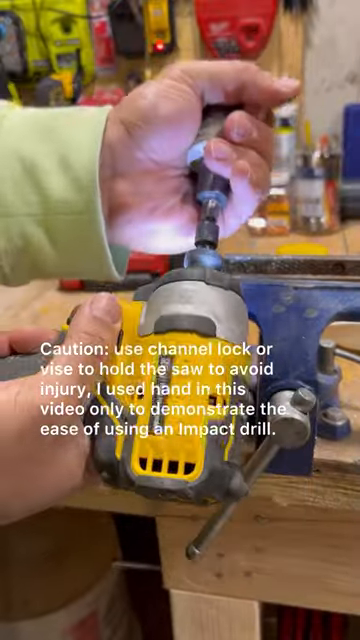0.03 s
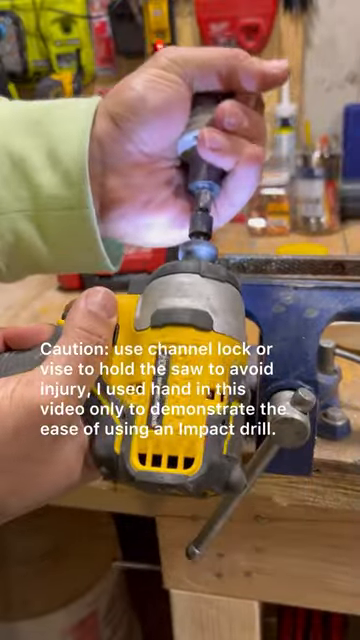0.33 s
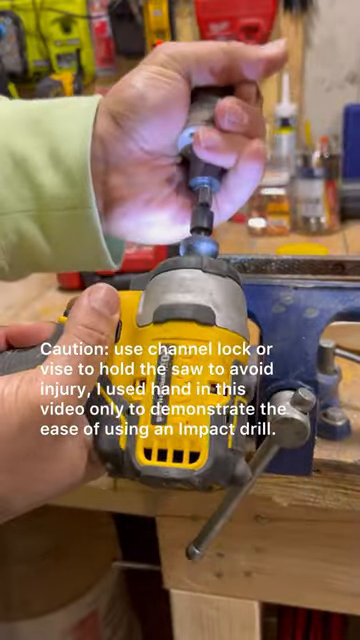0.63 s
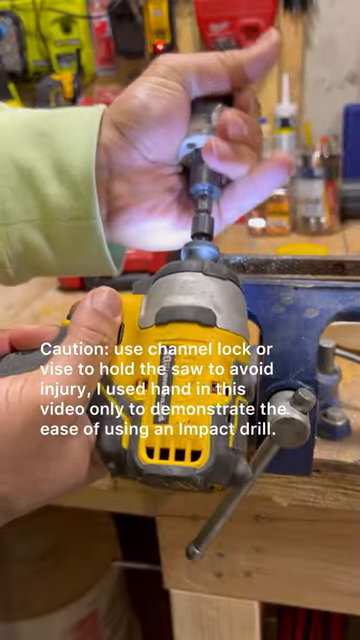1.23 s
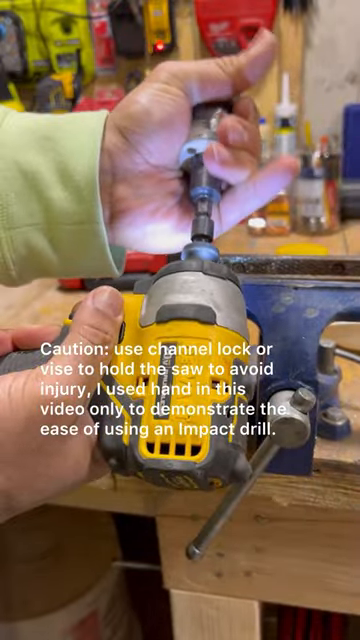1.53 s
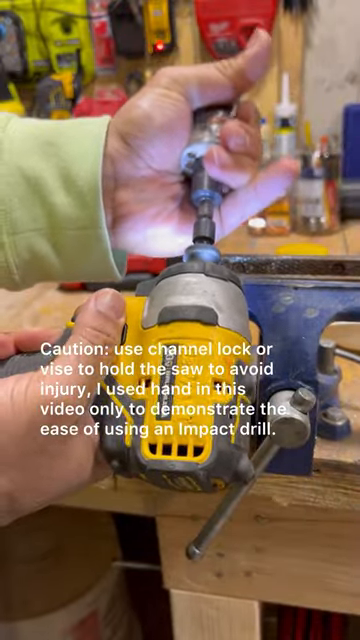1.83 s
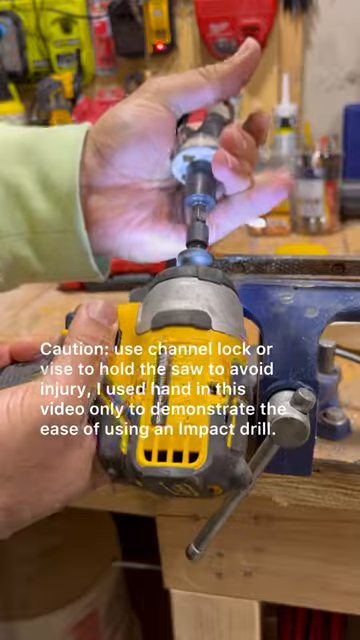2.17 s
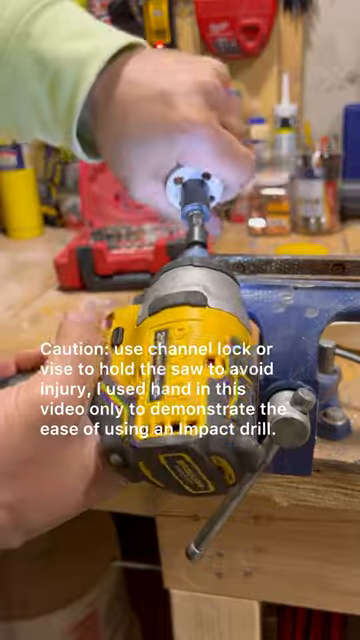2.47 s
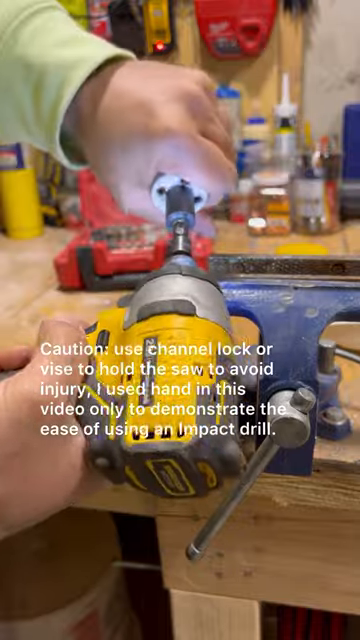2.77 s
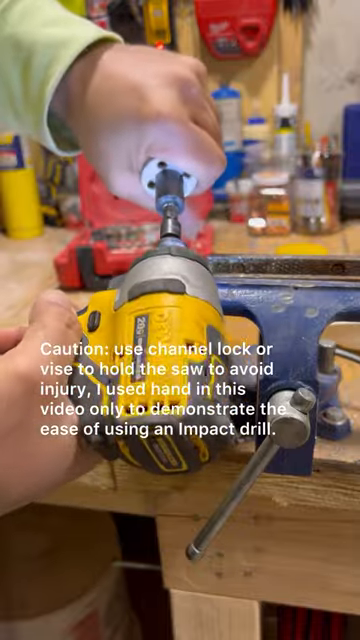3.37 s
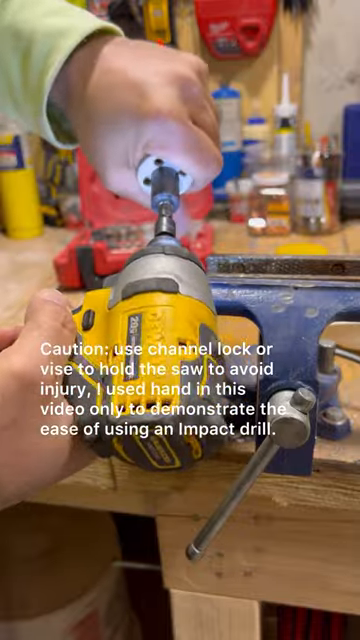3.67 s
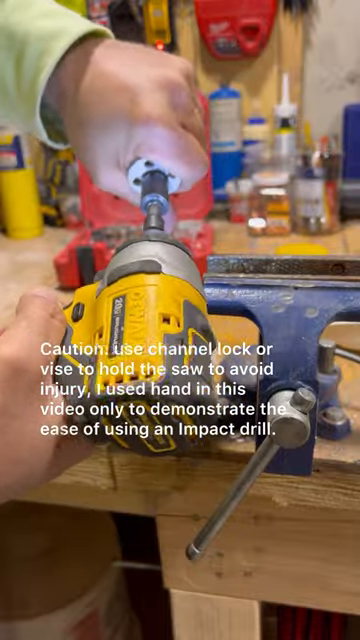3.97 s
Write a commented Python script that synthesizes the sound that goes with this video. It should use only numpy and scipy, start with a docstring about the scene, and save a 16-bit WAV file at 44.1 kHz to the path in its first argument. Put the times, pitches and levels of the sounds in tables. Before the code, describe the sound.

A cordless impact driver hammers in two loud rattling bursts with a short pause between.

```python
"""A cordless impact driver turns a hand-held socket in two bursts, close by in a small workshop.
Each burst opens with slow single blows of hammer on anvil, then hammers about 62-81 times a second:
a graze, a strike and two rebounds each time, with the steel ringing and the socket rattling.
Dull falling thuds shake the bench, the socket clicks as the grip changes in the pause,
and at the end the motor whines on, unloaded."""
import sys
import numpy as np
from scipy import signal
from scipy.fft import rfft, irfft, next_fast_len
from scipy.io import wavfile
from scipy.ndimage import uniform_filter1d, map_coordinates

SR = 44100
rng = np.random.default_rng(int(sys.argv[2]) if len(sys.argv) > 2 else 0)


def wrap_up_sound(samples):
    """Save the sound to the file named by the first command line argument, as 16-bit audio."""
    columns = np.atleast_2d(samples).T
    # keep every value between -1 and 1, then stretch to whole-number steps
    tamed = np.clip(columns, -1, 1)
    steps = np.round(tamed * 32767).astype(np.int16)
    wavfile.write(sys.argv[1], SR, steps)


N = 176400
REBOUND_S, TOP_HZ = .0029, 15900  # from strike to first rebound; band limit


def amp(db):
    """Decibels to gain."""
    return 10 ** (np.asarray(db) / 20)


def unit(x):
    """Scale to rms 1."""
    return x / np.sqrt(np.mean(x ** 2) + 1e-20)


def along(points, hz):
    """Read a (frequency [Hz], value) curve on a log axis."""
    f, v = np.transpose(points)
    return np.interp(np.log(hz + 1), np.log(np.abs(f) + 1), v)


def grid():
    """Frequencies of the padded transform."""
    return np.fft.rfftfreq(2 * next_fast_len(N * 2 // 3), 1 / SR)


def filtered(x, response):
    """Filter x with a response on the frequency grid."""
    return irfft(rfft(x, 2 * len(response) - 2) * response)[..., :N]


def colour(*spectra):
    """A causal EQ of unit power from stacked (frequency [Hz], level [dB]) curves."""
    hz = grid()
    gain = amp(sum(along(s, hz) for s in spectra))
    gain /= np.sqrt(np.mean(gain ** 2 * (hz < TOP_HZ)))
    cepstrum = irfft(np.log(np.maximum(gain, 1e-6)))
    cepstrum[1:len(hz) - 1] *= 2  # fold to minimum phase
    cepstrum[len(hz):] = 0
    return np.exp(rfft(cepstrum))


def resonances(rows):
    """An EQ curve from peaks (centre [Hz], width [Hz], gain [dB])."""
    hz = np.geomspace(100, SR / 2, num=2000)
    curve_db = sum(db / (1 + (2 * (hz - centre) / width) ** 2) for centre, width, db in rows)
    return np.transpose([hz, curve_db])


def wobble(rate):
    """A smooth random curve, rate knots a second."""
    knots = rng.standard_normal(int(N * rate / SR) + 4)
    return map_coordinates(knots, [np.arange(N) * rate / SR])


def burst(t60):
    """Frequency response of a short dying noise burst, roughly flat."""
    t = np.arange(2 * len(grid()) - 2) / SR
    z = rfft(rng.standard_normal(len(t)) * np.exp(-np.log(1000) * t / t60))
    flat = irfft(z / (np.abs(z) + .2 * np.abs(z).mean()))
    flat *= np.exp(-(np.minimum(t, 5 * (t[-1] - t)) / t60) ** 2)  # keep it tight
    return rfft(flat / np.linalg.norm(flat))


def contacts(s, db, t60, *spectra, firm=1):
    """Steel hits at times s: part rings alike each time, part is fresh clatter, more so when less firm."""
    # share of a firm hit that repeats (frequency [Hz], power share [0-1])
    repeatable = [(300, .6), (750, 0.87), (3000, 0.84), (6000, 0.5), (14000, .3)]
    scatter_db = .8 * rng.standard_normal(len(s))
    size = amp(db + scatter_db) * np.sqrt(.003 * SR)  # level over 3 ms
    taps = np.bincount(np.clip(np.round(s * SR).astype(int), 0, N), size, N + 1)[:N]
    decay = np.exp(-2 * np.log(1000) / (t60 * SR))
    clatter = np.sqrt(signal.lfilter([1 - decay], [1, -decay], taps ** 2)) * rng.standard_normal(N)
    share = np.clip(firm * along(repeatable, grid()), 0, 1)
    body = colour(*spectra)
    alike = filtered(taps, body * burst(t60) * np.sqrt(share))
    return alike + filtered(clatter, body * np.sqrt(1 - share))


def ringing(s, db, modes):
    """Every hit rings the same few steel modes."""
    t = np.arange(SR // 2) / SR
    ring = sum(amp(level - 60 * t / t60) * np.cos(2 * np.pi * hz * t) for hz, level, t60 in modes)
    taps = np.bincount(np.round(s * SR).astype(int), amp(db), N)
    return signal.fftconvolve(taps, ring)[:N]


def room_tone():
    """A faint bed of workshop air and hum."""
    # air noise and hum tones, each (frequency [Hz], level [dB])
    air_eq = [(25, -42.5), (60, -11.5), (82, -8), (125, -13.5), (300, -11.5), (800, -18.5), (2100, -23.5),
              (3000, -29), (5000, -34.5), (9000, -37), (15800, -39.5)]
    hum_tones = [(80.7, -83.5), (1184, -94.5), (2095, -88), (2614, -92), (3973, -95.5)]
    hum = sum(amp(db) * np.sqrt(2) * np.sin(2 * np.pi * hz * np.arange(N) / SR) for hz, db in hum_tones)
    return amp(-71.5) * unit(filtered(rng.standard_normal(N), colour(air_eq))) + hum


def motor():
    """Pulsing gear and fan noise swells in with the trigger; once unloaded, the motor whines."""
    # trigger pulls (on [s], off [s], level [dB])
    pulls = [(-.1, 2.1, -35), (2.607, 2.665, -47.5), (2.66, 4.1, -39.5)]
    # gear and fan noise (frequency [Hz], level [dB])
    gear_eq = [(60, -41), (300, -22), (1500, -14.5), (2700, -10), (3150, -9), (4500, -8.5), (6200, -10),
               (7500, -10.5), (9000, -8), (11000, -17), (15800, -17.5)]
    # free-running whine (time [s], pitch [Hz], level [dB])
    whine_path = [(3.86, 2726, -56), (3.88, 2950, -49), (3.9, 3130, -41), (3.93, 3064, -42),
                  (3.95, 3110, -45.5), (4, 3260, -46)]
    # its first three harmonics (gain [dB])
    harmonics = [-3.5, 0.5, 3]
    spin_up_s, spin_down_t60, gear_hz = .031, .033, 69.3
    t = np.arange(N) / SR
    throttle = sum(amp(db - 60 * np.maximum(t - off, 0) / spin_down_t60)
                   * (1 - np.exp(-np.maximum(t - on, 0) / spin_up_s)) for on, off, db in pulls)
    pulsing = amp(3 * np.sin(2 * np.pi * gear_hz * t) + 2 * wobble(700))
    gears = amp(-1.5) * throttle * filtered(rng.standard_normal(N), colour(gear_eq))
    s, hz, db = np.transpose(whine_path)
    pitch = np.interp(t, s, hz) * (1 + .02 * wobble(1200))
    phase = 2 * np.pi * np.cumsum(pitch) / SR
    whine = sum(amp(gain_db) * np.sin(k * phase) for k, gain_db in enumerate(harmonics, 1))
    swell = amp(np.interp(t, s, db)) * (t > s[0])
    return pulsing * (gears + swell * whine)


def bench_thuds():
    """Jolts cross the bench as bending waves: the highs arrive first, so each thud sweeps down."""
    # jolts (time [s], level [dB])
    thuds = [(0.0023, -30), (0.06, -31.5), (0.0841, -36.5), (0.0989, -34), (0.1381, -36), (0.2257, -24),
             (0.2426, -22.5), (0.285, -23), (0.3123, -25.5), (0.3253, -24.5), (0.342, -27.5), (0.3533, -22),
             (0.3803, -30.5), (0.4078, -18), (0.4342, -27), (0.449, -21), (0.463, -21.5), (0.4755, -27),
             (0.49, -30.5), (0.5025, -29.5), (0.5172, -23), (0.5444, -28.5), (0.7087, -35.5), (0.741, -31),
             (0.926, -31.5), (1.024, -44), (1.1187, -37), (1.2264, -37.5), (1.338, -50), (3.0337, -32.5),
             (3.0727, -37), (3.1092, -35), (3.1212, -31.5), (3.1474, -35), (3.1718, -21), (3.1829, -42.5),
             (3.2223, -30)]
    # dull body of the bench (frequency [Hz], level [dB])
    bench_eq = [(25, -18.5), (60, -12), (110, 1.5), (220, 0.5), (400, -4.5), (900, -8.5), (1500, -11),
                (3000, -56)]
    delay_s = .15  # travel time at 1 Hz
    hz = grid()
    wave = amp(along(bench_eq, hz)) * np.exp(-4j * np.pi * delay_s * np.sqrt(hz))
    s, db = np.transpose(thuds)
    jolts = np.bincount(np.round(s * SR).astype(int), amp(db + .5), N)
    return filtered(jolts, wave / np.abs(irfft(wave)).max())


def slow_blows():
    """The hammer ticks up its cam, snaps onto the anvil, rebounds and leaves the socket rattling."""
    # single blows (time [s], level [dB])
    blows = [(.0042, -17.5), (0.0617, -15.5), (0.0994, -15), (.138, -18), (.1757, -15.5), (0.209, -16.5),
             (2.678, -19.5), (2.7104, -18), (2.741, -19.5), (2.7731, -18), (2.8042, -18.5), (2.8353, -17),
             (2.8684, -18)]
    # cam ticks (lead before the blow [s], level against the blow [dB])
    ticks = [(.0145, -13.5), (0.0112, -16.5), (.007, -21), (.0037, -9.5)]
    # tone of the tool at low speed (frequency [Hz], level [dB])
    body = [(35, -44.5), (60, -25), (197, -6.5), (280, -19), (425, -6), (537, -5.5), (1240, -5),
            (2450, -0.5), (2950, -2.5), (4700, 4.5), (5800, -1), (14700, -7.5), (15800, -11.5)]
    s, db = np.transpose(blows)
    lead, tick_db = np.transpose(ticks)
    climb = contacts((s[:, None] - lead).ravel(), (db[:, None] + tick_db).ravel(), .012,
                     body, [(1500, 5), (9000, -4)])
    snap = contacts(s, db - .5, .0071, body, [(1500, -4.5), (5000, 0), (10000, 3.5)])
    rebound = contacts(s + REBOUND_S, db - 6, .0065, body)
    rattle = contacts(s + REBOUND_S, db - 9.5, .034, body)
    return climb + snap + rebound + rattle


def hammering(runs, grip_eq, grip_peaks):
    """Two hammer jaws in turn graze the anvil, strike it and rebound twice; the socket rattles between."""
    # tone of each kind of contact (frequency [Hz], gain [dB])
    graze_eq = [(700, -5), (3000, 3.5), (11000, -4.5)]
    strike_eq = [(300, 3), (1200, 3.5), (2500, 6), (4500, 1), (11000, -5)]
    rebound_eq = [(700, -2), (2500, -1.5), (4500, 1.5), (11000, -0.5)]
    rattle_eq = [(300, -3), (800, -4.5), (2500, -1.5), (11000, -0.5)]
    # ring of socket and anvil (frequency [Hz], level against the strike [dB], t60 [s])
    steel_modes = [(2475, -21, 0.024), (2702, -25, 0.065), (3380, -20, 0.028), (3420, -33.5, 0.11),
                   (4500, -29, .08), (4800, -38, .11)]
    graze_lead_s, last_rebound_s, strike_t60, rebound_t60 = .0017, .0051, .0055, .0086
    jaw_lag_s, jitter_s, bounce_jitter_s = 5e-6, 1e-5, 5e-5
    blows = [(at, *levels) for start, end, rate, *levels in runs for at in np.arange(start, end, 1 / rate)]
    s, strike_db, rebound_db, rattle_db = np.transpose(blows)
    s = s + jaw_lag_s * (-1) ** np.arange(len(s)) + jitter_s * rng.standard_normal(len(s))
    build_db = -3.5 * np.exp(-np.abs(s - s[0]) / .015)  # the first blows are softer
    strike_db, rebound_db = strike_db + build_db, rebound_db + build_db
    slop = bounce_jitter_s * rng.standard_normal((3, len(s)))
    body = grip_eq, resonances(grip_peaks)
    graze = contacts(s - graze_lead_s + slop[2], strike_db - 11, strike_t60, *body, graze_eq)
    strike = contacts(s, strike_db - .5, strike_t60, *body, strike_eq)
    rebounds = contacts(s + REBOUND_S + slop[0], rebound_db - 1.5, rebound_t60, *body, rebound_eq)
    rebounds += contacts(s + last_rebound_s + slop[1], rebound_db - 6.5, rebound_t60, *body, rebound_eq)
    rattle = contacts(s + last_rebound_s, rattle_db + 2, .061, *body, rattle_eq, firm=.3)
    return graze + strike + rebounds + rattle + ringing(s, strike_db, steel_modes)


def socket_shift(x):
    """The socket shifts in the hand: treble resonances come and go; under hard load the ring moves up."""
    # depth of the wandering tone (frequency [Hz], share [0-1])
    depth = [(2000, 0.05), (4500, .6), (9000, 0.99)]
    # spells of hard load (start [s], end [s])
    load_spells = [(.22, .72), (2.89, 3.22)]
    # tone under that load (centre [Hz], width [Hz], gain [dB])
    load_peaks = [(2426, 370, -1.5), (3330, 310, 2.5), (4850, 1100, -1), (6340, 730, 5), (7300, 600, -0.5),
                  (12930, 3000, -0.5)]
    hz, t, z = signal.stft(x, SR, nperseg=256, noverlap=192)

    def ripple(frames):
        """A random pattern, smooth in frequency and time."""
        blur = np.outer(np.hanning(9), np.hanning(frames))
        return unit(signal.fftconvolve(rng.standard_normal(z.shape), blur, 'same'))

    wander_db = (1.5 * ripple(frames=14) + 1.4 * ripple(frames=140)) * along(depth, hz)[:, None]
    load = uniform_filter1d(sum(1. * (t > on) * (t < off) for on, off in load_spells), size=20)
    load_db = np.outer(along(resonances(load_peaks), hz), load)
    return signal.istft(z * amp(wander_db + load_db), SR, nperseg=256, noverlap=192)[1][:N]


def grip_clicks():
    """The loose socket clicks and pings faintly as the hand changes grip."""
    # clicks (time [s], level [dB])
    clicks = [(2.218, -57.5), (2.2215, -66), (2.2394, -69), (2.2797, -57), (2.305, -69), (2.484, -67.5),
              (2.498, -70.5), (2.5496, -73)]
    # their tone (frequency [Hz], level [dB])
    click_eq = [(300, -16), (2000, 2), (4700, 4), (8000, -6), (15000, -3)]
    # ping of the socket (frequency [Hz], level against the click [dB], t60 [s])
    ping_modes = [(1480, -22, .35), (2110, -23, .3), (4715, -21, 0.28), (9900, -25, .15), (14700, -24, .08)]
    s, db = np.transpose(clicks)
    return contacts(s, db, .015, click_eq) + ringing(s, db, ping_modes)


def workshop(x):
    """The short reverb of a cluttered room, with 5 ms of pre-delay."""
    # room decay (frequency [Hz], t60 [s])
    decay = [(100, 0.35), (1000, 0.1), (4000, 0.15), (15000, 0.12)]
    hz, t, z = signal.stft(rng.standard_normal(SR // 2), SR, nperseg=256)
    tail = signal.istft(z * amp(-60 * t / along(decay, hz)[:, None]), SR, nperseg=256)[1]
    return signal.fftconvolve(np.pad(x, (SR // 200, 0)), tail / np.linalg.norm(tail))[:N]


def scene():
    """One burst in an open hand, one in a fist; the tool sits centre, widest in the top treble."""
    # steady hammering (start [s], end [s], rate [blows/s], strike [dB], rebound [dB], rattle [dB])
    runs = [(0.224, 0.267, 64.7, -20.5, -15, -21), (0.2715, 0.553, 73, -17.5, -17, -26),
            (0.5595, 0.718, 73.7, -20, -19, -29), (0.726, 0.895, 64.8, -22, -20.5, -29),
            (0.9004, 1.305, 73.6, -22.5, -21.5, -30), (1.3107, 1.703, 72.3, -23, -21.5, -29.5),
            (1.709, 2.102, 72.58, -25, -20.5, -31), (2.893, 2.936, 62, -19.5, -14.5, -23.5),
            (2.9408, 3.005, 71.34, -17.5, -15.5, -23.5), (3.0095, 3.217, 78, -18, -17, -22.5),
            (3.2241, 3.636, 72.2, -18, -20, -25), (3.6413, 3.859, 81.3, -20.5, -19.5, -27.5)]
    # tone of tool and socket in each grip (frequency [Hz], level [dB])
    open_eq = [(60, -54.5), (120, -30), (290, -22), (420, -22.5), (580, -9.5), (860, -10), (1250, -9.5),
               (1550, -8), (2100, -5), (2520, -0.5), (2950, -5), (3350, -2), (4100, -4.5), (5000, -3.5),
               (5800, -7.5), (6600, -7), (7500, -11.5), (8300, -7.5), (10500, -8), (14000, -8.5),
               (15800, -6.5)]
    fist_eq = [(60, -48), (120, -27), (330, -20), (550, -19.5), (740, -13.5), (1200, -14.5), (1600, -8.5),
               (2000, -6), (2450, 0), (2900, -6.5), (3300, 0.5), (3900, -4.5), (4550, -3), (5400, -5.5),
               (6200, -7), (7500, -8.5), (9000, -5.5), (15800, -11.5)]
    # their resonances (centre [Hz], width [Hz], gain [dB])
    open_peaks = [(953, 70, 4), (1178, 100, 7.5), (1413, 54, 5.5), (3340, 200, 2), (5000, 220, 2),
                  (8270, 250, 2), (12500, 600, 2), (14900, 730, 1.5)]
    fist_peaks = [(723, 87, 5.16), (1010, 70, 4.02), (1147, 57.6, 2.7), (4600, 300, 2.8), (11800, 400, 2.5),
                  (15000, 390, 2.5)]
    # stereo width (frequency [Hz], side gain [dB])
    width_eq = [(100, -52), (250, -29.5), (500, -16.5), (1000, -18), (2500, -24.5), (5000, -22),
                (9000, -14), (14000, 1.5)]
    regrip_s = 2.4
    first = hammering([run for run in runs if run[0] < regrip_s], open_eq, open_peaks)
    second = hammering([run for run in runs if run[0] > regrip_s], fist_eq, fist_peaks)
    tool = socket_shift(first + second) + slow_blows() + motor() + grip_clicks()
    mid = tool + amp(-18) * workshop(tool) + bench_thuds() + room_tone()
    diffuse = filtered(mid, 1j * burst(t60=.014).imag) + amp(-8) * workshop(workshop(mid))
    side = filtered(diffuse, amp(along(width_eq, grid())))
    return np.array([mid + side, mid - side])


def record(dry):
    """A steep low-pass at the band limit."""
    return filtered(dry, np.clip((TOP_HZ - grid()) / 400 + .5, 0, 1) ** 2)


dry = scene()
out = record(dry)
wrap_up_sound(out)
```